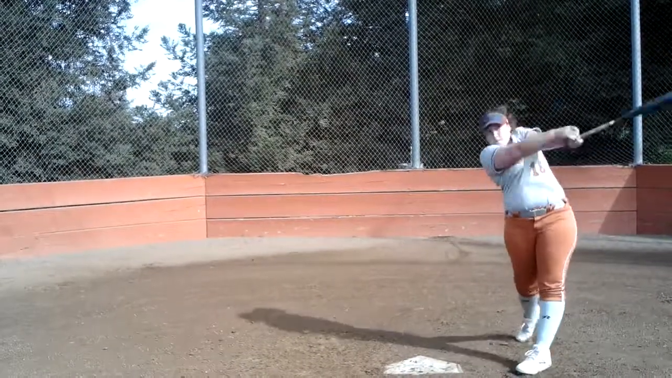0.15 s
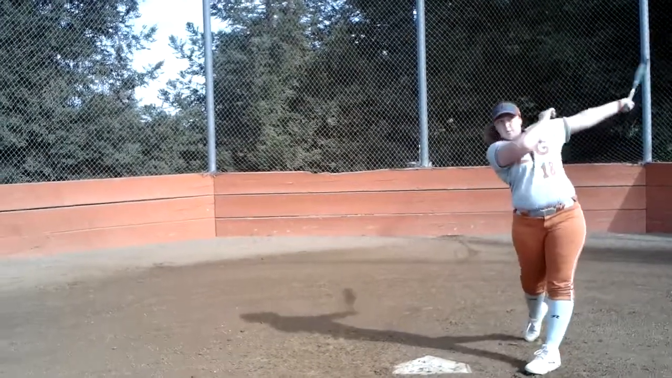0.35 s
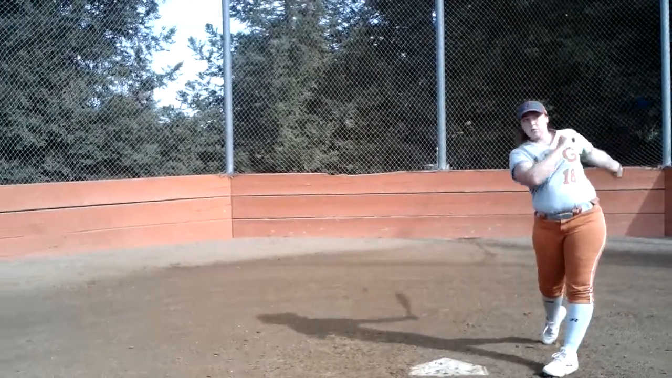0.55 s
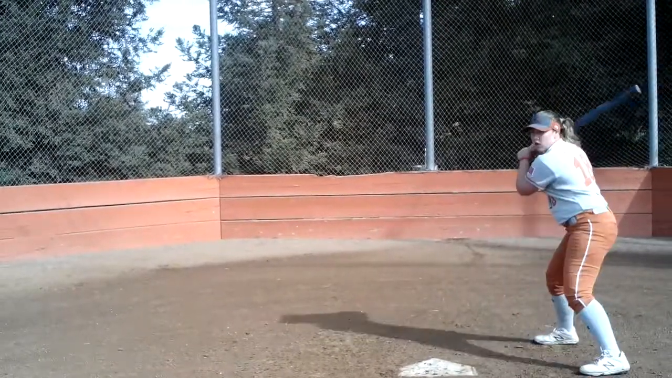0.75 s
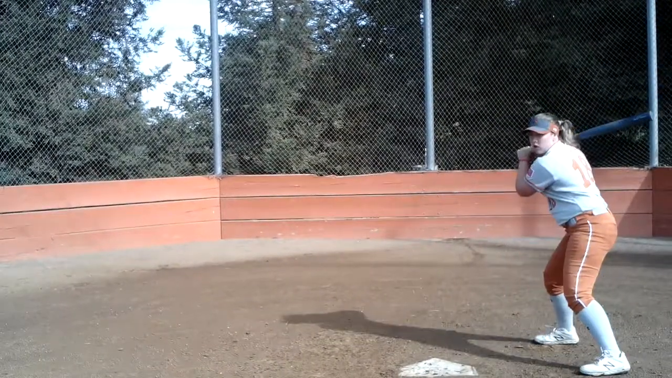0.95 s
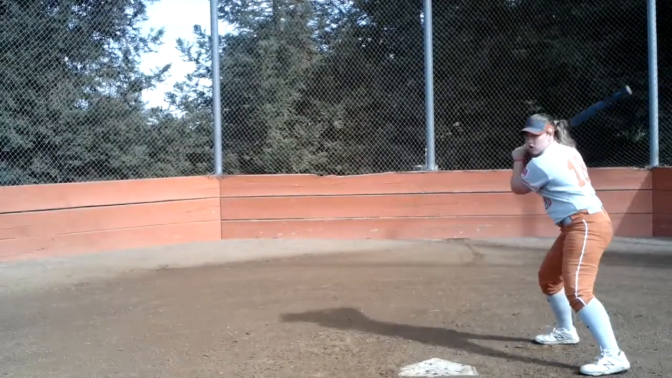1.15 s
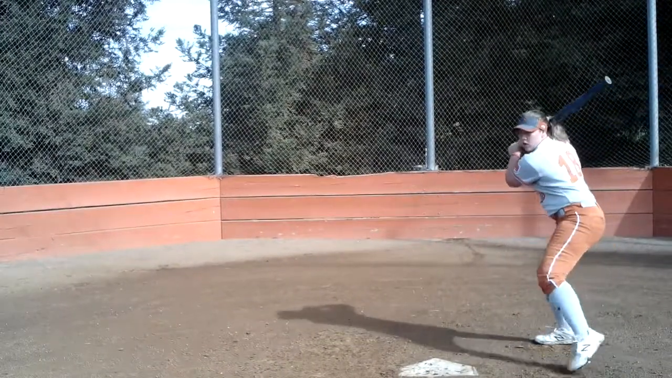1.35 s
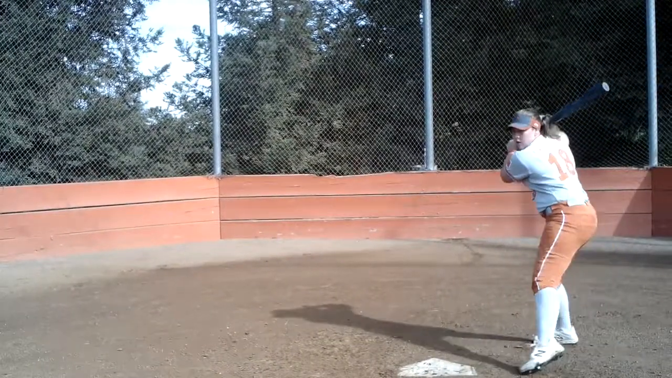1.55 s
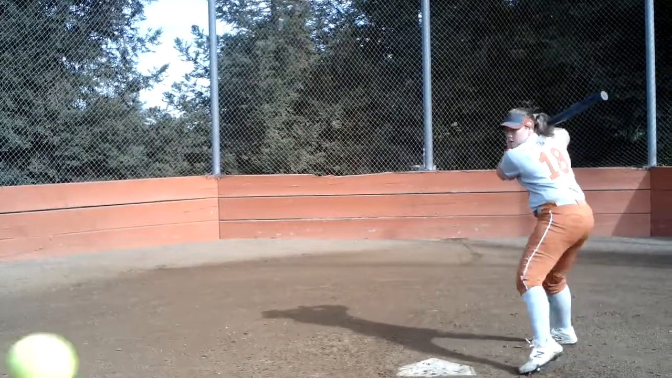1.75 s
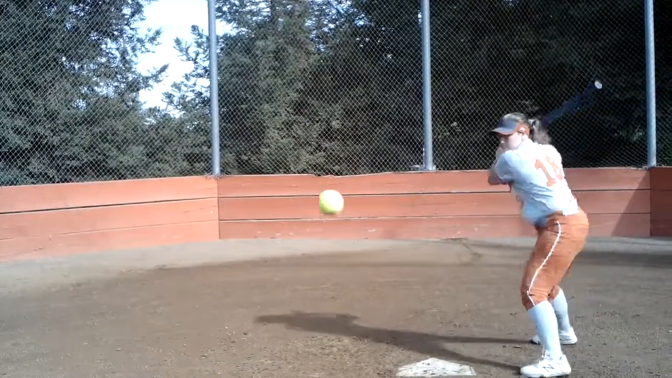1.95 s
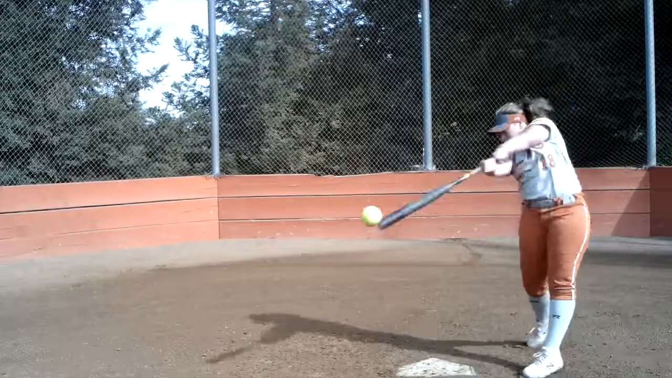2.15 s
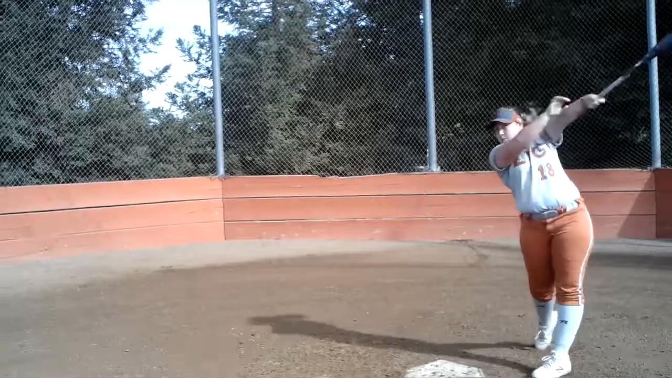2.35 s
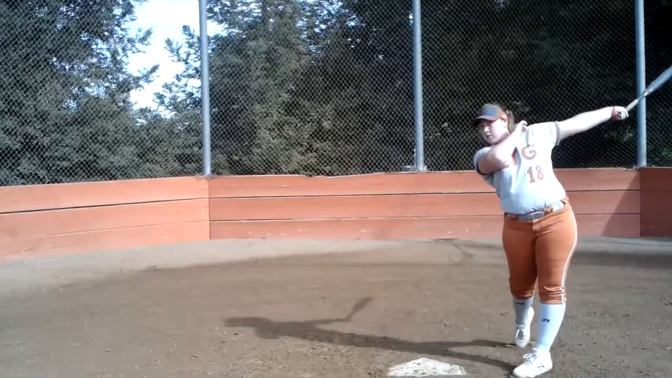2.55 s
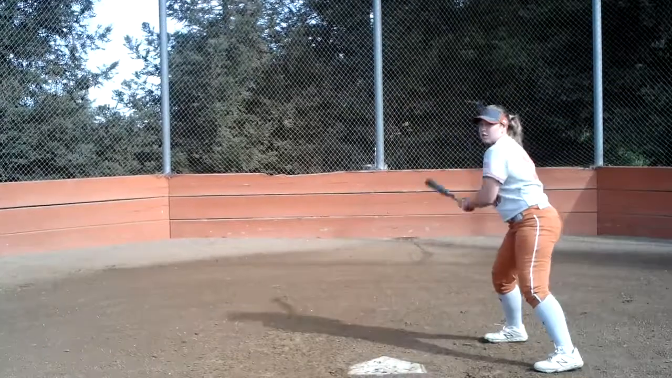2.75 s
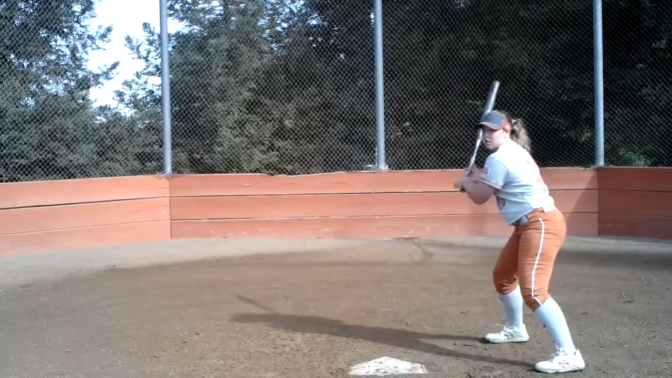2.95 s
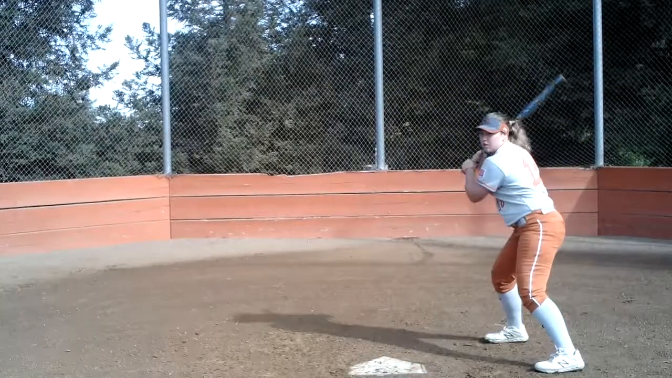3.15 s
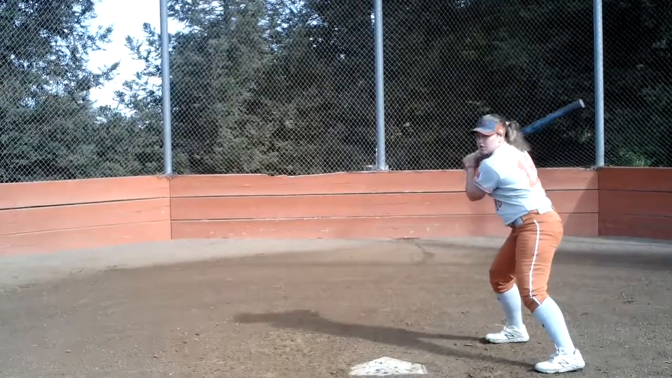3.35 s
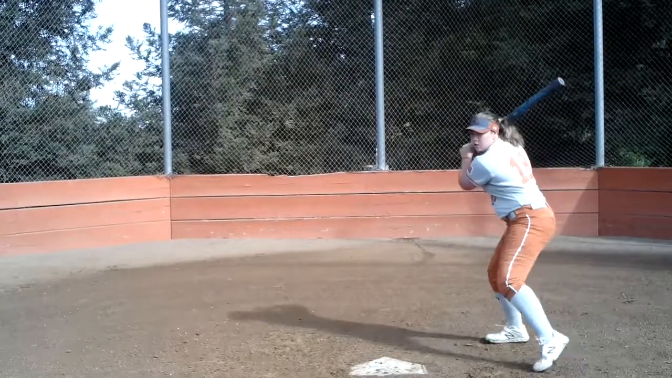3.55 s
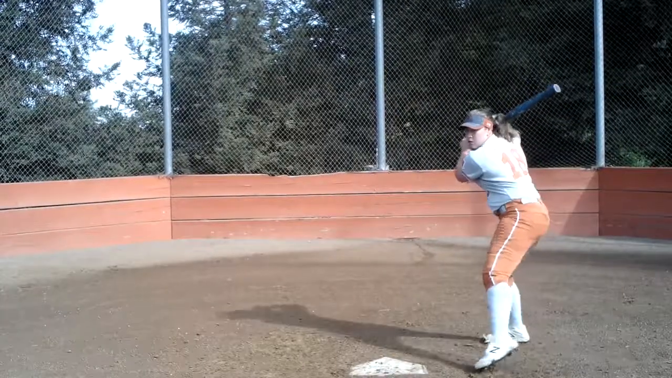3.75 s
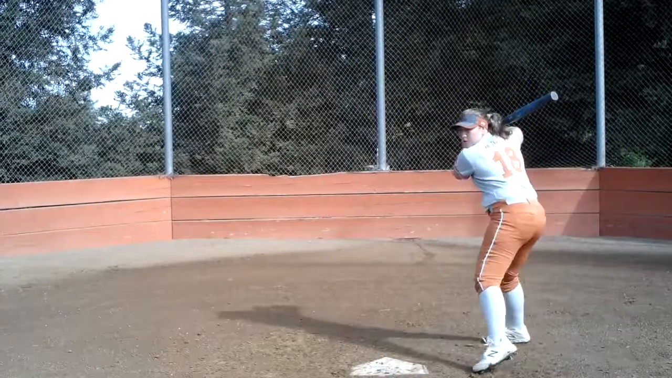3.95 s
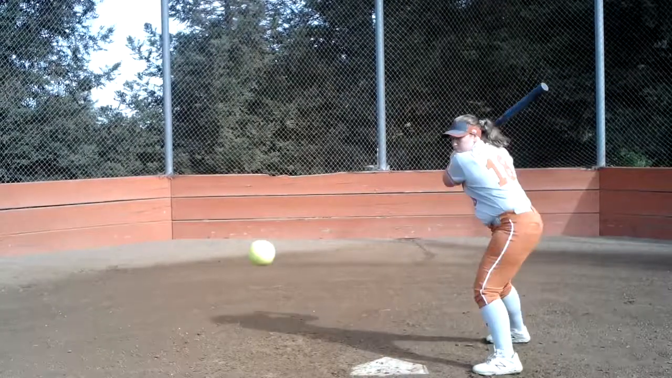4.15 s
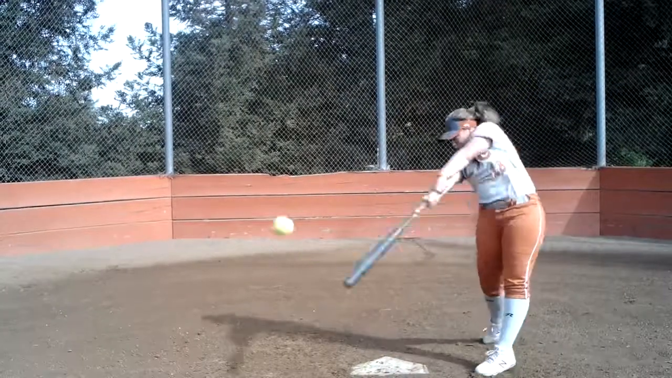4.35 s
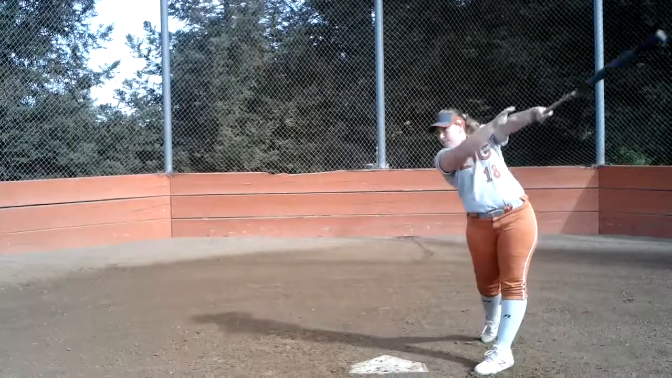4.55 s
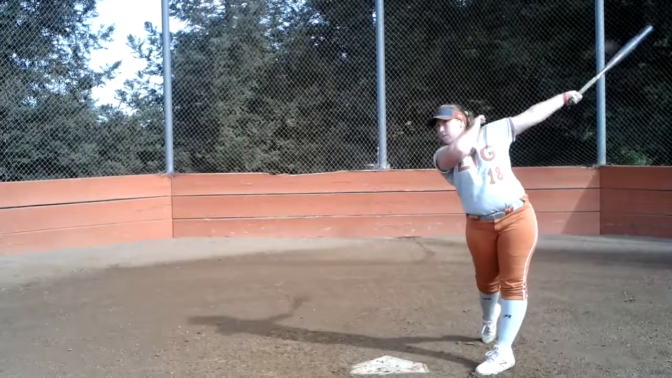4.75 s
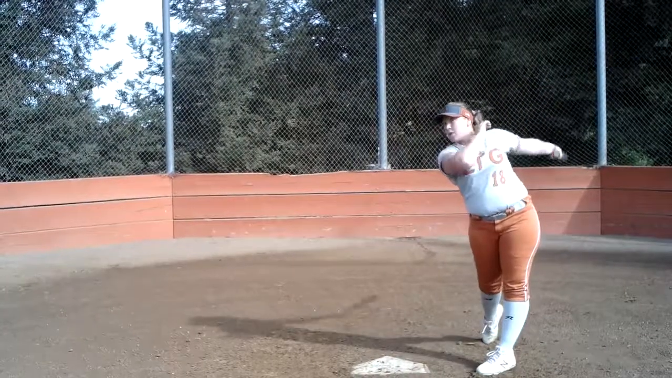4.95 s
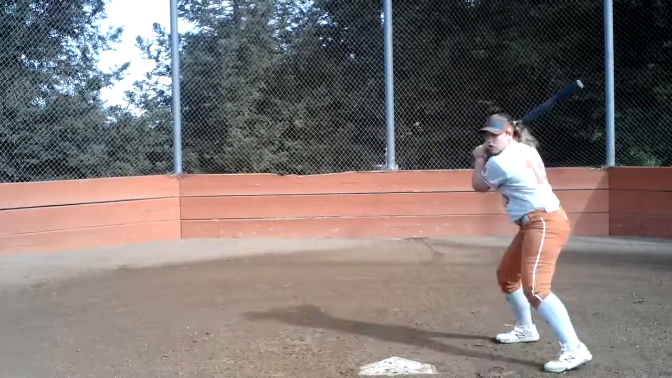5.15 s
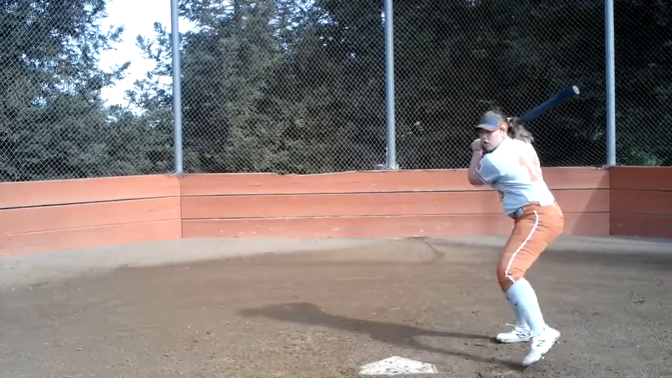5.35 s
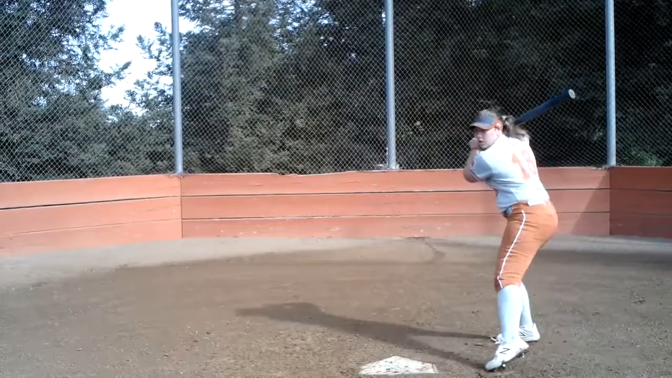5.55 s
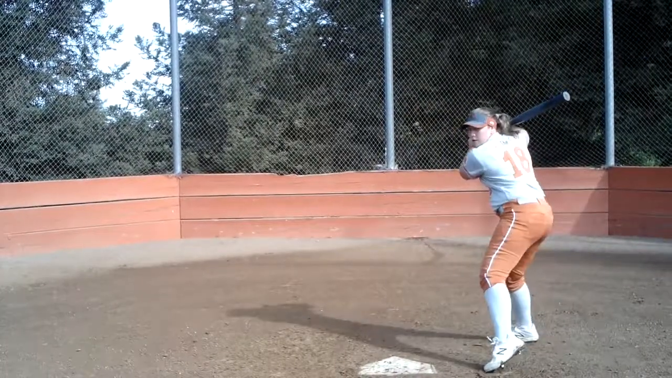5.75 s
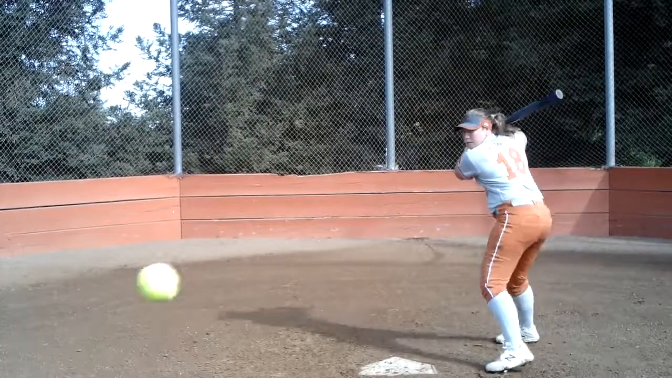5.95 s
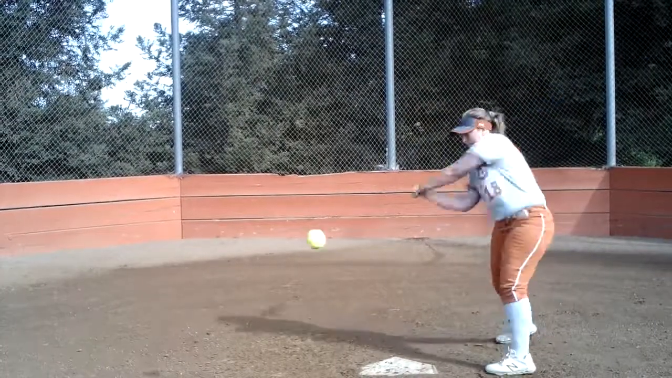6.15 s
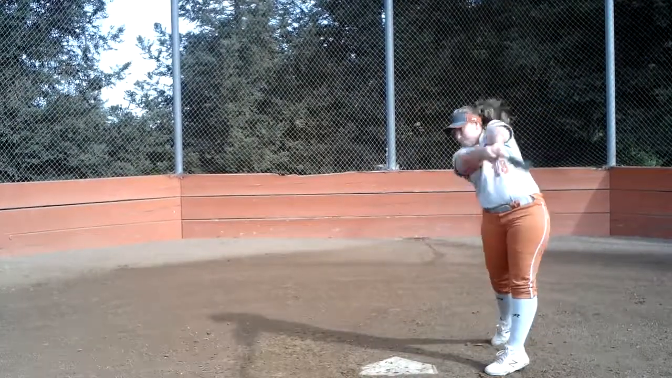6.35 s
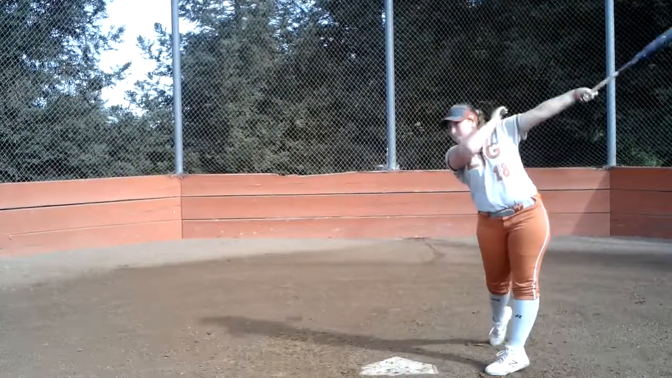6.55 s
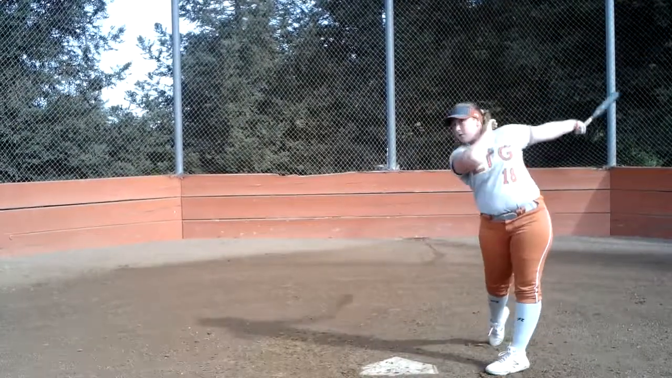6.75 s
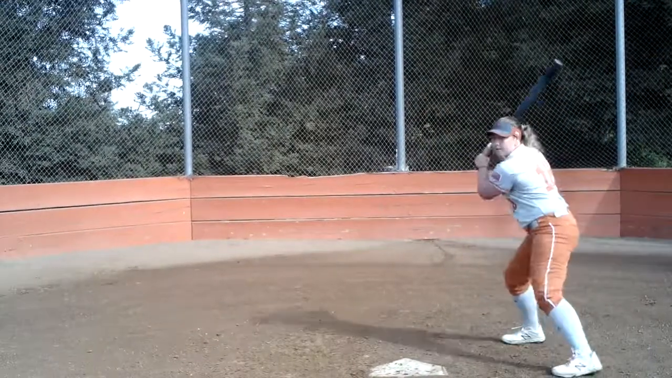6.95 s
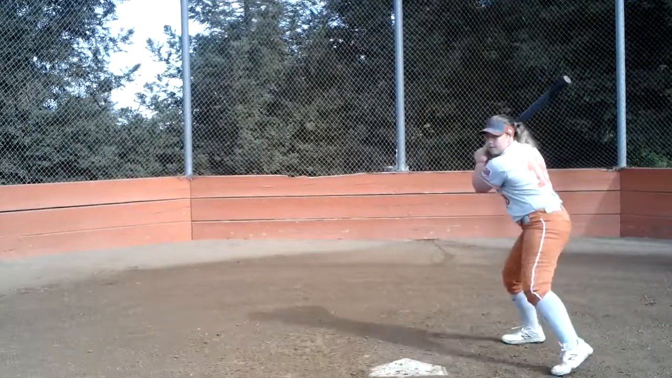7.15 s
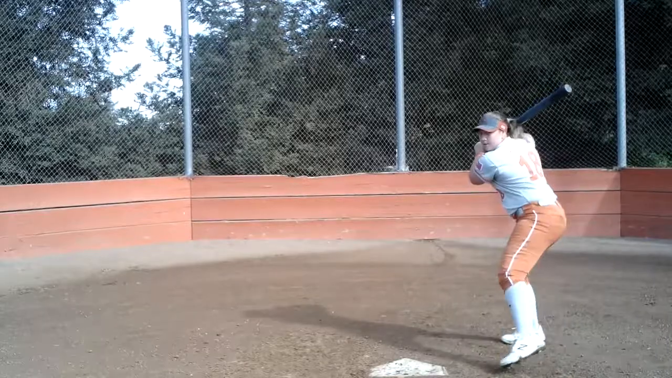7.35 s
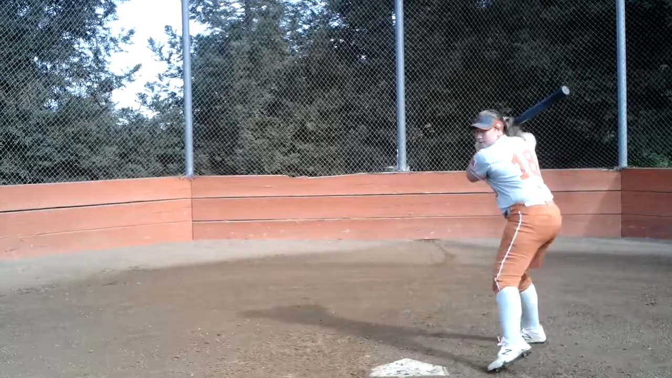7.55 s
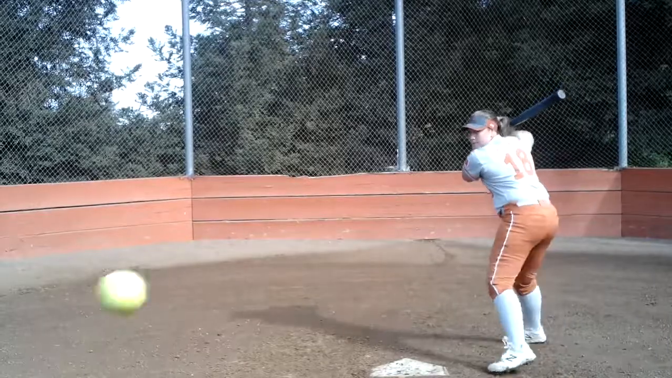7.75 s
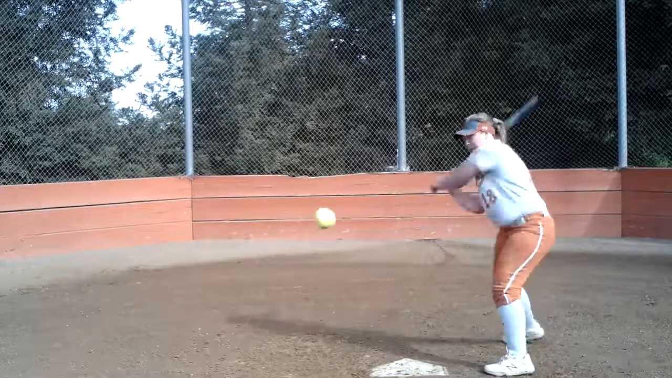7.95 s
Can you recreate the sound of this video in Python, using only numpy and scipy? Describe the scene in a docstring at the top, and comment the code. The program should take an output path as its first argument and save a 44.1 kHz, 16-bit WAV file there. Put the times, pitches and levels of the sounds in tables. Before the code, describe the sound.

Four sharp, overloading bat cracks on softballs about two seconds apart, the first two followed by wire screen rattles, echoing outdoors with wind gusts late.

```python
"""Quiet open air, then at once a bat crack that overloads the microphone: softball practice on a dirt field.
Each of four cracks is decaying sines plus splinter noise; low boards slap back, fence and trees scatter.
The first two balls hit a wire screen close by: click showers, clinks, shivering mesh and singing wires.
Between swings: click-shower ticks and scuffs, filtered-noise cloth, a far bird's gliding sines.
Gusts, strongest late, are lumpy low noise with single eddies thumping the microphone."""
import sys
import numpy as np
from scipy import signal
from scipy.fft import rfft, irfft, next_fast_len
from scipy.io import wavfile
from scipy.ndimage import uniform_filter1d

SR = 44100
rng = np.random.default_rng(int(sys.argv[2]) if len(sys.argv) > 2 else 0)


def transcribe(u):
    """Save the signal u as a 16-bit wav file named by the first command-line argument.

    u: samples, shape (n,) or (channels, n), limited to [-1, 1]; the rate is SR.
    q: integer samples, one column per channel.
    """
    v = np.clip(np.atleast_2d(u).T, -1, 1)
    q = np.round(v * 32767).astype(np.int16)
    wavfile.write(sys.argv[1], SR, q)


N = 352359
TIME = np.arange(N) / SR


def from_db(db):
    """Decibels to gain."""
    return 10 ** (np.asarray(db) / 20)


def rms_one(x):
    """Scale to an rms of one."""
    return x / np.sqrt(np.mean(x ** 2) + 1e-20)


def at_hz(points, hz):
    """Read a spectrum on a log-frequency axis."""
    f, value = np.transpose(points)
    return np.interp(np.log(np.maximum(hz, 1)), np.log(f), value)


def cut(x, hz, kind, order=2):
    """Butterworth filter."""
    sos = signal.butter(order, np.clip(hz, 10, 0.45 * SR), kind, fs=SR, output="sos")
    return signal.sosfilt(sos, x + 1e-18)


def colour(x, spectrum, tilt_db=0):
    """Give noise a spectrum, tilted in dB per octave above the bass; rms 1."""
    size = next_fast_len(len(x))
    hz = np.arange(size // 2 + 1) * SR / size
    gain = from_db(at_hz(spectrum, hz) + tilt_db * np.log2(1 + hz / 500))
    return rms_one(irfft(rfft(x, size) * gain, size)[:len(x)])


def drift(knots_per_s):
    """Random wander of rms 1, straight lines between random knots."""
    knots = rng.standard_normal(4000)
    return rms_one(np.interp(TIME * knots_per_s, np.arange(len(knots)), knots))


def fade(t, t60):
    """Exponential decay, 60 dB in t60."""
    return from_db(-60 * t / t60)


def envelope(s, rise_s, hold_s, t60):
    """Swell up to a time, hold, then die away."""
    t = TIME - s
    return np.clip(1 + t / rise_s, 0, 1) * fade(np.maximum(t - hold_s, 0), t60)


def add(out, s, sound):
    """Mix a sound in at a time."""
    i = int(np.clip(round(s * SR), 0, N - 1))
    out[i:i + len(sound)] += sound[:N - i]


def struck(modes, t):
    """Decaying sines after one blow, signs alternating."""
    out = 0
    for k, (hz, db, t60) in enumerate(modes):
        out = out + (-1) ** k * from_db(db) * np.sin(2 * np.pi * hz * t) * fade(t, t60)
    return out


def resonance(count, hz, width_hz):
    """Noise in one resonance; rms 1."""
    band_hz = [hz - width_hz / 2, hz + width_hz / 2]
    return rms_one(cut(rng.standard_normal(count), band_hz, "band", order=1))


def bursts(rows, spectrum, grain_db):
    """Each contact is a shower of tiny uneven clicks that dies away."""
    out, t = np.zeros(N), np.arange(SR // 4) / SR
    for s, db, t60, tilt_db in rows:
        white, size = rng.standard_normal((2, len(t)))
        clicks = colour(white * from_db(grain_db * size), spectrum, tilt_db)
        add(out, s, from_db(db) * clicks * fade(t, t60))
    return out


# Air spectrum. Each row: frequency in Hz, relative density in dB per Hz.
AIR_SPECTRUM = [(15, -28), (25, -2.5), (57, -4), (79, -5.5), (118, -5), (264, -15), (293, -16.5),
                (373, -17.5), (427, -19), (529, -16.5), (978, -15.5), (3090, -31), (3930, -31.5),
                (12800, -42.5), (15000, -56)]
# Faint high hiss of the open air. Each row: time in seconds, level in dB.
AIR_HISS_LEVELS = [(0, -62.5), (1.2, -68), (3.8, -67), (4.8, -64), (5.4, -68), (6.7, -62.5), (7.99, -64.5)]
DISTANT_DB = -56.5


def open_air():
    """Steady distant low-passed rumble, and a faint high-passed hiss, a little stronger after cracks."""
    air = colour(rng.standard_normal(N), AIR_SPECTRUM)
    rumble = rms_one(cut(air, 600, "low", order=3))
    hiss = rms_one(cut(air, 900, "high", order=3))
    return from_db(DISTANT_DB) * rumble + from_db(np.interp(TIME, *np.transpose(AIR_HISS_LEVELS))) * hiss


# Scatter spectrum. Each row: frequency in Hz, relative density in dB per Hz.
SCATTER_SPECTRUM = [(100, -13.5), (300, -6), (500, -3), (820, -2.5), (1300, 1), (2400, -3), (3900, -3.5),
                    (6000, -7), (9000, -11.5), (12000, -19.5), (14500, -24)]
# Scatter decay. Each row: frequency in Hz, t60 in seconds.
SCATTER_DECAY = [(200, 0.94), (800, 0.43), (3500, 0.47), (7000, 0.46), (14000, 0.38)]


def scatter(t):
    """Countless weak echoes from fence and trees; the bass lasts longest and a faint far tail stays."""
    out, edges_hz = 0, np.geomspace(100, 15000, 22)
    grains = rng.standard_normal((2, len(t))) * from_db(3.0 * rng.standard_normal(len(t)))
    for k, (low, high) in enumerate(zip(edges_hz, edges_hz[1:])):
        hz = np.sqrt(low * high)
        t60 = at_hz(SCATTER_DECAY, hz)
        patches = from_db(2.2 * np.interp(t, np.linspace(0, 1, 70), rng.standard_normal(70)))
        decay = fade(t, t60) + from_db(-23) * fade(t, 1.8 * t60)
        band = cut(grains[k % 2], [low, high], "band")
        out = out + from_db(at_hz(SCATTER_SPECTRUM, hz)) * band * patches * decay
    return out * (1 - np.exp(-t / 0.013))   # builds up gradually


def reflections(sound, t):
    """Posts and trunks each return a small copy of a sound, about 500 per second."""
    taps = (rng.random(len(t)) < 500 / SR) * rng.standard_normal(len(t)) * fade(t, 0.31)
    return signal.fftconvolve(sound, taps)[:len(t)]


# Bat on ball. Each row: start in seconds, pock, snap, barrel ring and splinter levels in dB,
# pitch ratio of pock and snap, echo delay in seconds, thud level in dB, scatter and fence hum level in dB.
HITS = [(0.0651, 0.5, -0.5, -8.5, 4.5, 0.97, 0.033, -7, 0.5), (2.2059, 4, 2, -4, 1, 0.98, 0.032, -10, 2),
        (4.3924, -3.5, -6.5, -1, 3, 1.02, 0.0313, 1.5, 2), (6.2894, -1, 2, -3, 3, 0.98, 0.0319, -1.5, 4)]
# Pock of the ball, before the pitch ratio. Each row: frequency in Hz, relative level in dB, t60 in seconds.
POCK_MODES = [(808, 9, 0.028), (927, 4, 0.02)]
# Shell snapping back, before the pitch ratio. Each row: frequency in Hz, relative level in dB, t60 in seconds.
SNAP_MODES = [(1622, 6.5, 0.02), (1740, 3.5, 0.019), (2074, 9, 0.0047), (2500, 1, 0.022)]
# Barrel ringing on. Each row: frequency in Hz, relative level in dB, t60 in seconds.
BARREL_MODES = [(1132, -1, 0.062), (1600, -18, 0.05), (3830, -15, 0.035), (5400, -18, 0.035),
                (7480, -17, 0.03)]
# Splinter noise. Each row: frequency in Hz, relative density in dB per Hz.
SPLINTER_SPECTRUM = [(100, -14), (400, -6), (1500, 3.5), (4000, -2.5), (7500, -5), (10000, -10),
                     (12000, -14), (15000, -25)]
# Low thud of the boards. Each row: frequency in Hz, relative level in dB, t60 in seconds.
THUD_MODES = [(460, -22.5, 0.033), (575, -16, 0.035)]
# Fence humming on. Each row: frequency in Hz, width in Hz, relative level in dB, t60 in seconds.
FENCE_HUM = [(805, 70, -41, 0.28), (1200, 170, -50.5, 0.66), (3640, 290, -48.5, 0.7), (4670, 300, -54, 0.8),
             (6700, 900, -50.5, 0.5), (2530, 970, -55, 1.3)]
SECOND_ECHO_S, REFLECTIONS_S = 0.0044, 0.005   # after the first echo


def bat():
    """Direct crack, and its echoes: a dull slap off the boards, a bright one just after, then scatter."""
    direct, echoes, t = np.zeros(N), np.zeros(N), np.arange(SR) / SR
    for s, pock_db, snap_db, ring_db, splinter_db, pitch, delay, thud_db, scatter_db in HITS:
        splinter = colour(rng.standard_normal(len(t)), SPLINTER_SPECTRUM)
        pock = from_db(pock_db) * struck(POCK_MODES, t * pitch)
        snap = from_db(snap_db) * struck(SNAP_MODES, t * pitch)
        shell = snap + from_db(ring_db) * struck(BARREL_MODES, t)
        splinter_decay = from_db(6.0) * fade(t, 0.016) + from_db(-29.5) * fade(t, 0.12)
        add(direct, s, pock + shell + from_db(splinter_db) * splinter * splinter_decay)

        echo_s = s + delay
        slap = from_db(-13.5) * np.sin(2 * np.pi * 720 * t) * fade(t, 0.0096)
        slap += from_db(-19) * cut(splinter, 3200, "low") * fade(t, 0.031)
        add(echoes, echo_s, slap + from_db(thud_db) * struck(THUD_MODES, t))
        bright = from_db(-24.5) * pock + from_db(-25) * shell + from_db(-18.0) * splinter * fade(t, 0.019)
        add(echoes, echo_s + SECOND_ECHO_S, bright)
        copies = reflections(from_db(-42.5) * pock + from_db(-46.5) * shell, t)
        add(echoes, echo_s + REFLECTIONS_S, copies)
        hum = sum(from_db(db) * resonance(len(t), hz, width_hz) * fade(t, t60)
                  for hz, width_hz, db, t60 in FENCE_HUM)
        add(echoes, echo_s, from_db(scatter_db) * (from_db(-29.5) * scatter(t) + hum))
    return direct, echoes


# Ball sets the screen moving. Each row: start in seconds, length in seconds, relative shiver level in dB,
# t60 of the sway in seconds, relative rumble level in dB.
SCREEN_CRASHES = [(0.237, 0.435, -35.5, 1.3, -42.5), (2.369, 0.365, -30.5, 0.94, -37)]
JOLT_DB, JOLT_T60_S = 6, 0.37   # first jolt, relative to the sway
SHAKE_ATTACK_S, SETTLE_T60_S = 0.012, 0.08


def shaking():
    """A crash jolts the screen, which sways on, then settles: gains of (being in motion, shiver, rumble)."""
    moving = shiver = rumble = 0
    for s, length, shiver_db, t60, rumble_db in SCREEN_CRASHES:
        t = np.maximum(TIME - s, 0)
        gate = envelope(s + SHAKE_ATTACK_S, SHAKE_ATTACK_S, length - SHAKE_ATTACK_S, SETTLE_T60_S)
        motion = gate * (from_db(JOLT_DB) * fade(t, JOLT_T60_S) + fade(t, t60))
        moving = moving + gate
        shiver = shiver + from_db(shiver_db) * motion
        rumble = rumble + from_db(rumble_db) * motion
    return moving, shiver, rumble


def jingle(moving, per_s, spread_db, t60):
    """Loose links touch at random while the mesh moves; each touch rings three pitches of its own."""
    out, t = np.zeros(N), np.arange(SR // 20) / SR
    active = np.flatnonzero(moving > 0.01)
    for when, size, *places in rng.random((int(per_s * len(active) / SR), 5)):
        modes = [(900 * 8 ** place, -5 * place, t60) for place in places]   # 900 to 7200 Hz
        add(out, TIME[active[int(when * len(active))]], from_db(spread_db * size) * struck(modes, t))
    return out / np.std(out[active])


# Wires set singing. Each row: start in seconds, frequency in Hz, width in Hz, level in dB, t60 in seconds.
SINGING_WIRES = [(0.302, 2425, 37, -38.5, 0.73), (0.413, 2398, 11, -31.5, 0.62),
                 (0.585, 1920, 38, -29, 0.1), (0.584, 5420, 31, -47.5, 0.23),
                 (2.371, 2960, 60, -21.5, 0.44), (2.372, 8350, 180, -25.5, 0.33),
                 (2.60, 2650, 36, -37.5, 0.16), (2.60, 3440, 53, -36, 0.18), (2.60, 5400, 100, -36, 0.074),
                 (2.643, 4220, 300, -35.5, 0.11)]
WIRE_ATTACK_S = 0.01


def singing():
    """Each wire swells quickly and fades as a narrow resonance with a wavering pitch."""
    out, t = np.zeros(N), np.arange(SR // 2) / SR
    for s, hz, width_hz, db, t60 in SINGING_WIRES:
        tone = resonance(len(t), hz, width_hz)
        level_tone = tone / np.sqrt(uniform_filter1d(tone ** 2, size=900))
        swell = from_db(db) * np.minimum(t / WIRE_ATTACK_S, 1) * fade(t, t60)
        add(out, s, swell * level_tone)
    return out


# Ball and wires strike the screen. Each row: start in seconds, level in dB, t60 in seconds,
# treble tilt in dB per octave, clink level in dB.
CLASHES = [(0.2360, -4, 0.11, 0.5, -20.5), (0.2446, -6, 0.07, 3, -19.5), (0.3434, -21.5, 0.016, -0.5, -21),
           (0.3683, -27, 0.019, -3, -28.5), (0.4036, -24, 0.015, -5.5, -31.5), (0.461, -37, 0.027, -5, -56),
           (0.478, -39, 0.033, -1, -37), (0.499, -29, 0.012, -3, -50), (0.579, -39.5, 0.14, 7, -57),
           (0.638, -42, 0.13, -7, -58.5), (2.3698, -6.5, 0.033, 1, -10.5), (2.3769, -17, 0.16, 4, -25),
           (2.4011, -22, 0.025, -10.5, -19.5), (2.4518, -21.5, 0.021, 7, -33), (2.478, -24.5, 0.09, 6, -39),
           (2.5044, -18.5, 0.037, 1, -19.5), (2.5994, -27, 0.035, -12, -49),
           (2.642, -38.5, 0.099, 0.5, -44)]
# Mesh spectrum. Each row: frequency in Hz, relative density in dB per Hz.
MESH_SPECTRUM = [(40, -3), (130, -3), (280, -4.5), (550, 5.5), (1100, 5.5), (1900, 0.5), (2900, 0.5),
                 (4000, -2.5), (5500, -3), (8000, -6.5), (9500, -13.5), (13000, -23), (15000, -31.5)]
# Clink at each blow, before random detuning. Each row: frequency in Hz, relative level in dB, t60 in seconds.
CLINK_MODES = [(560, -8, 0.03), (942, -6, 0.025), (1790, -3, 0.02), (2980, 0, 0.016), (3880, -10, 0.025),
               (4730, -8, 0.028), (6260, -11, 0.025), (8260, -18, 0.044)]


def screen():
    """Wires clash and clink, the mesh shivers, jingles and sings on, and its frame rumbles."""
    moving, shiver_gain, rumble_gain = shaking()
    grains = rng.standard_normal(N) * from_db(3.5 * rng.standard_normal(N))
    shiver = from_db(-0.5) * colour(grains, MESH_SPECTRUM) * from_db(2.0 * drift(220))
    shiver = shiver + from_db(-3.5) * jingle(moving, per_s=170, spread_db=16.5, t60=0.024)
    rumble = rms_one(cut(rng.standard_normal(N), [35, 190], "band", order=3))
    out = shiver_gain * shiver + rumble_gain * rumble + moving * singing()
    t = np.arange(SR // 8) / SR
    for s, db, t60, tilt_db, clink_db in CLASHES:
        # every blow lands on another spot: 25 Hz and 2 dB spread
        modes = np.array(CLINK_MODES) + rng.standard_normal((len(CLINK_MODES), 3)) * [25, 2, 0]
        add(out, s, from_db(clink_db) * struck(modes, t))
    return out + bursts([row[:4] for row in CLASHES], MESH_SPECTRUM, grain_db=1.0)


# Small ticks. Each row: start in seconds, level in dB.
TICK_TIMES = [(0.819, -44.5), (0.956, -38), (1.610, -52.5), (1.793, -50), (3.154, -45.5), (5.056, -57)]
# Tick spectrum. Each row: frequency in Hz, relative density in dB per Hz.
TICK_SPECTRUM = [(150, 6), (450, 17), (1000, -11.5), (2600, 9.5), (5500, 1.5), (8000, 0), (10000, -35),
                 (15000, -57)]
TICK_T60_S, TICK_TILT_DB_PER_OCTAVE = 0.033, -1


def ticks():
    """Each tick is one short shower of clicks."""
    rows = [(s, db, TICK_T60_S, TICK_TILT_DB_PER_OCTAVE) for s, db in TICK_TIMES]
    return bursts(rows, TICK_SPECTRUM, grain_db=3.5)


# Strides into a pitch. Each row: time the swell is full in seconds, level in dB.
STRIDES = [(2.05, -55.5), (4.25, -60.5), (6.199, -68), (7.97, -54.5)]
STRIDE_RISE_S, STRIDE_HOLD_S, STRIDE_T60_S = 0.24, 0.1, 0.8
# Cloth spectrum. Each row: frequency in Hz, relative density in dB per Hz.
CLOTH_SPECTRUM = [(100, -7.5), (400, 0.5), (1200, 2), (2500, -12.5), (6000, -19), (14000, -28.5)]
# Shoes on dirt. Each row: start in seconds, level in dB, t60 in seconds, treble tilt in dB per octave.
SCUFFS = [(2.02, -52.5, 0.41, -1.5), (3.585, -60.5, 0.54, 2), (4.132, -50.5, 0.08, -3.5),
          (4.165, -43.5, 0.072, -2.5), (4.323, -44.5, 0.026, -6), (5.768, -56, 0.23, 8),
          (6.154, -46.5, 0.063, -2), (7.60, -58, 0.11, 11)]
# Dirt spectrum. Each row: frequency in Hz, relative density in dB per Hz.
DIRT_SPECTRUM = [(150, -14.5), (700, 0.5), (1400, 3.5), (2300, -8), (5000, -17), (9000, -23.5),
                 (15000, -36.5)]


def batter():
    """Clothes swish with each stride, and shoes grind the dirt in showers of clicks."""
    effort = sum(from_db(db) * envelope(s, STRIDE_RISE_S, STRIDE_HOLD_S, STRIDE_T60_S) for s, db in STRIDES)
    swish = effort * colour(rng.standard_normal(N), CLOTH_SPECTRUM)
    return swish + bursts(SCUFFS, DIRT_SPECTRUM, grain_db=6.5)


# Gusts at the microphone. Each row: time the swell is full in seconds, hold in seconds, relative level in dB.
GUSTS = [(1.95, 0.017, -46), (2.05, 0.049, -43), (2.136, 0.15, -47), (2.681, 0.052, -46.5),
         (5.699, 0.075, -48), (6.922, 0.024, -41), (7.026, 0.05, -33.5), (7.108, 0.066, -38),
         (7.257, 0.1, -40.5), (7.502, 0.017, -49), (7.656, 0.3, -38)]
GUST_RISE_S, GUST_T60_S = 0.03, 0.2
# Eddies thumping the diaphragm. Each row: start in seconds, approximate peak in dB, frequency in Hz.
EDDIES = [(6.915, -31.5, 151), (7.023, -24, 334), (7.074, -27.5, 380), (7.331, -28, 169.7),
          (7.668, -29, 130), (7.773, -19, 332), (7.787, -23.5, 312), (7.923, -29.5, 108)]


def wind():
    """Lumpy rumble that reaches higher as it grows, with single eddies on top."""
    gusts = [from_db(db) * envelope(s, GUST_RISE_S, hold, GUST_T60_S) for s, hold, db in GUSTS]
    strength = np.max(gusts, axis=0)
    low_noise = cut(rng.standard_normal(N), 180, "low", order=4)
    rumble = rms_one(cut(low_noise, 35, "high", order=1))
    flutter = rms_one(cut(rng.standard_normal(N), [160, 420], "band", order=3))
    lumps = from_db(2.0 * drift(59))
    out = strength * (rumble + flutter * strength / from_db(-26.0)) * lumps
    t = np.arange(SR // 10) / SR
    for s, db, hz in EDDIES:
        thump = 2 * np.sin(2 * np.pi * hz * t) * fade(t * hz, 3.57)   # down 60 dB in 3.57 cycles
        add(out, s, from_db(db) * cut(thump, 495, "low", order=3))
    return out


# Falling whistles. Each row: start in seconds, length in seconds, level in dB.
WHISTLES = [(5.049, 0.11, -75.5), (5.363, 0.22, -73.5), (7.76, 0.24, -69.5)]
WHISTLE_FROM_HZ, WHISTLE_TO_HZ = 4520, 3950
# Thin rising chips. Each entry: start in seconds.
CHIP_STARTS = [2.84, 3.302, 3.565, 4.05]
CHIP_S, CHIP_FROM_HZ, CHIP_TO_HZ, CHIP_DB = 0.09, 8380, 8560, -78


def bird():
    """Every call of a far bird is one wavering glide that swells and fades."""
    calls = [(s, length, WHISTLE_FROM_HZ, WHISTLE_TO_HZ, db) for s, length, db in WHISTLES]
    calls += [(s, CHIP_S, CHIP_FROM_HZ, CHIP_TO_HZ, CHIP_DB) for s in CHIP_STARTS]
    out, waver_hz = 0, 80 * drift(150)
    for start, length, from_hz, to_hz, db in calls:
        along = np.clip((TIME - start) / length, 0, 1)
        hz = from_hz + (to_hz - from_hz) * along + waver_hz
        out = out + from_db(db) * np.sin(np.pi * along) * np.sin(2 * np.pi * np.cumsum(hz) / SR)
    return out


OVERLOAD = 0.41   # amplitude limit


def overload(x):
    """The microphone flattens anything beyond its limit."""
    return x / (1 + (x / OVERLOAD) ** 12) ** (1 / 12)


def scene():
    """The direct crack is squared off and low-passed near 9 kHz; all else is overloaded apart, unfiltered."""
    direct, echoes = bat()
    flattened = overload(cut(direct, 8800, "low", order=6))
    crack = signal.sosfiltfilt(signal.butter(8, 9000, fs=SR, output="sos"), flattened + 1e-18)
    rest = open_air() + echoes + screen() + ticks() + batter() + wind() + bird()
    return (crack + overload(rest))[None]


def record(dry):
    """A steep low-pass cuts the top."""
    return cut(dry, 13800, "low", order=20)


dry = scene()
out = record(dry)
transcribe(out)
```